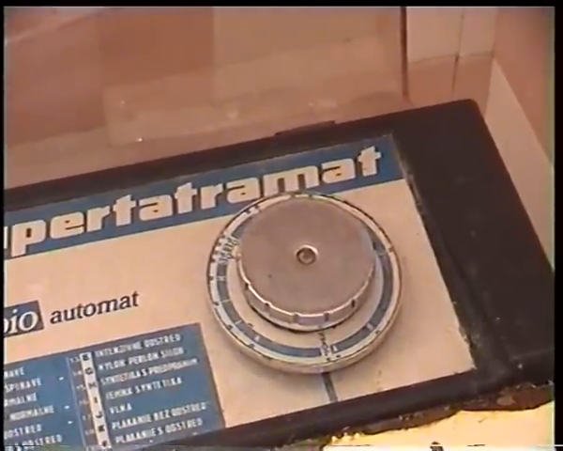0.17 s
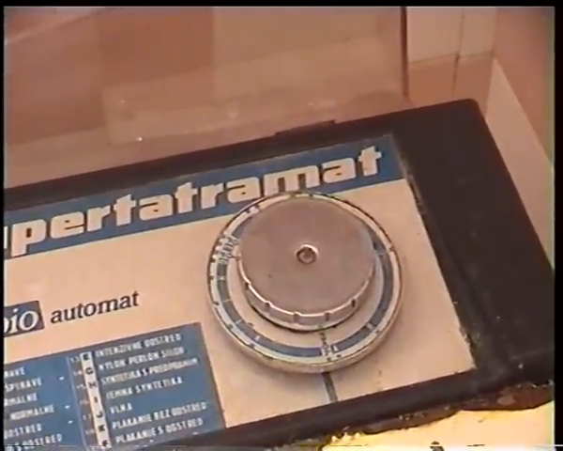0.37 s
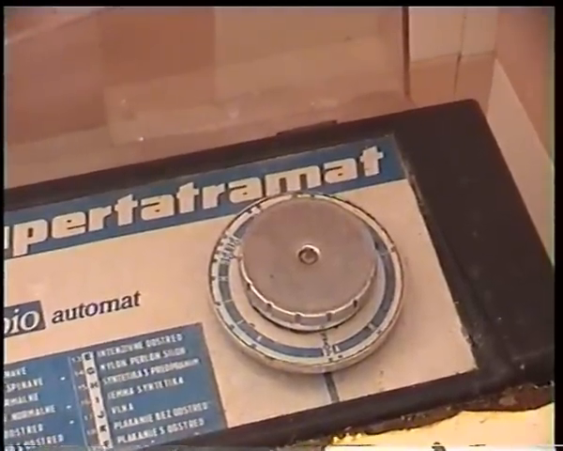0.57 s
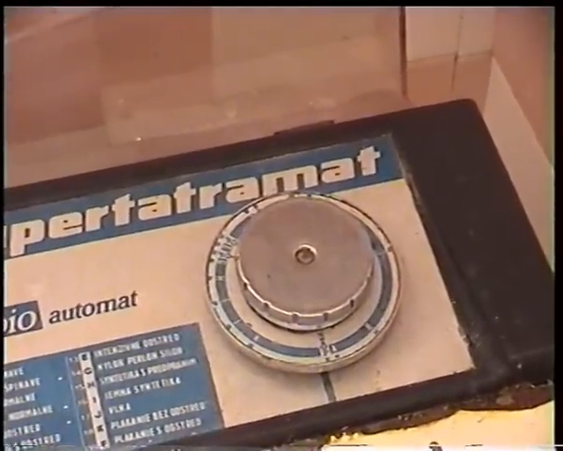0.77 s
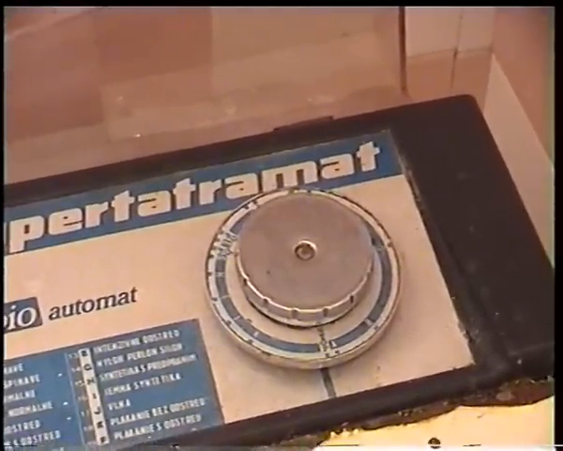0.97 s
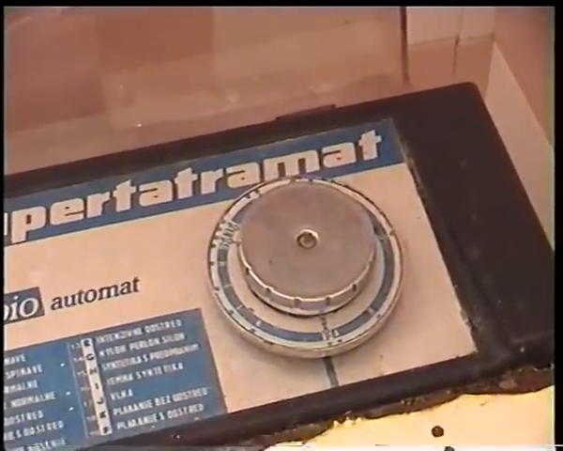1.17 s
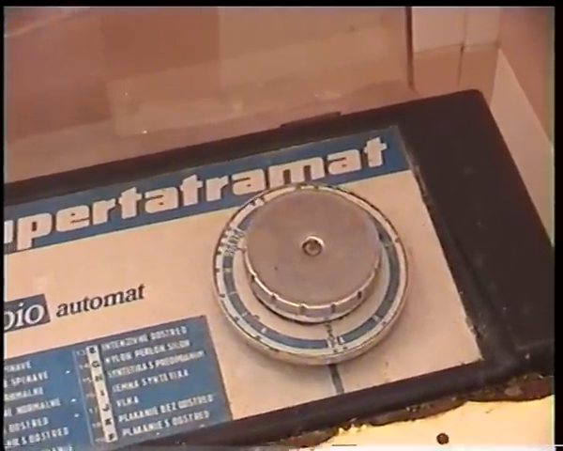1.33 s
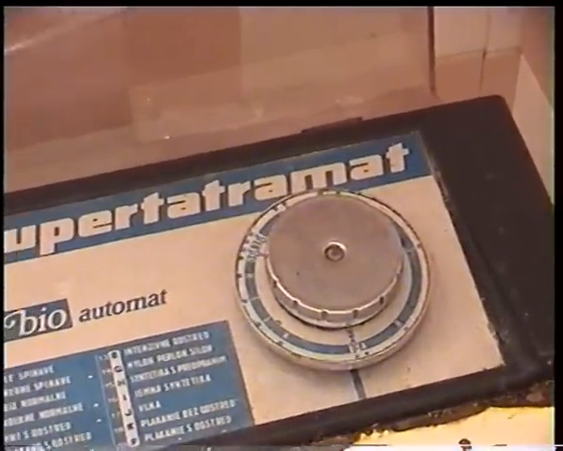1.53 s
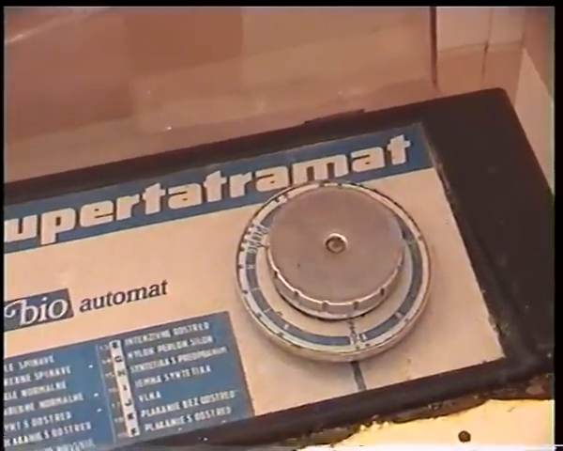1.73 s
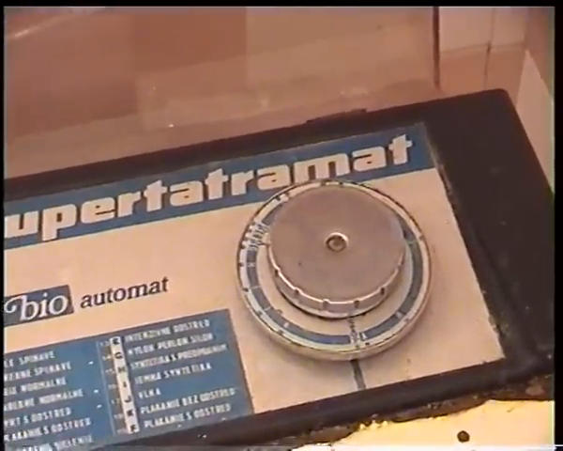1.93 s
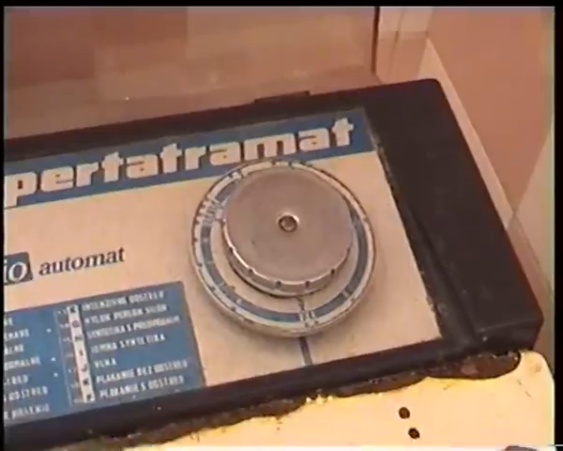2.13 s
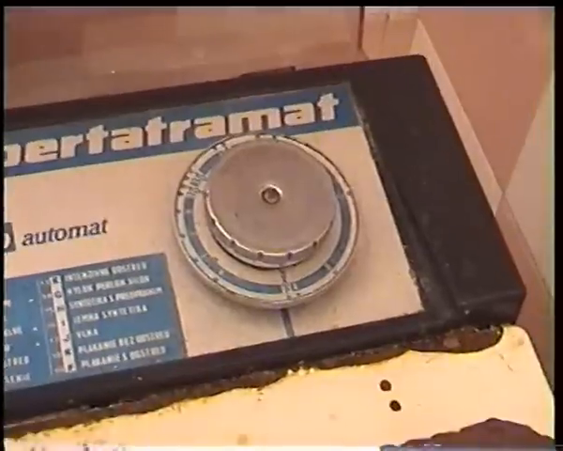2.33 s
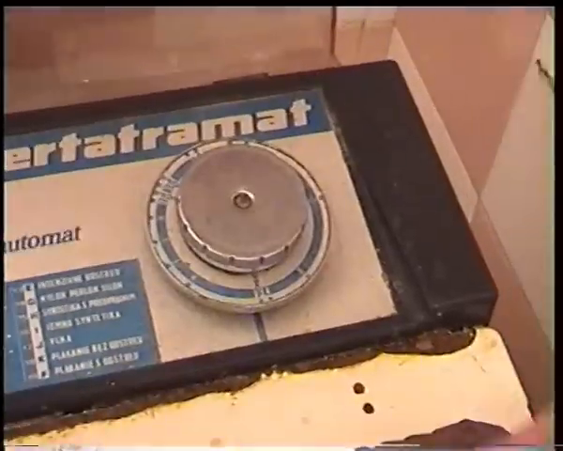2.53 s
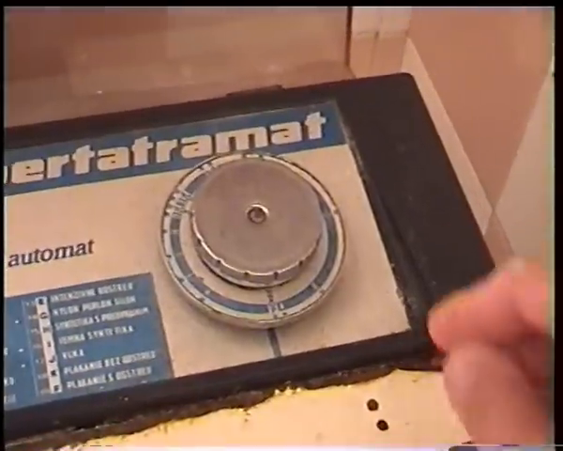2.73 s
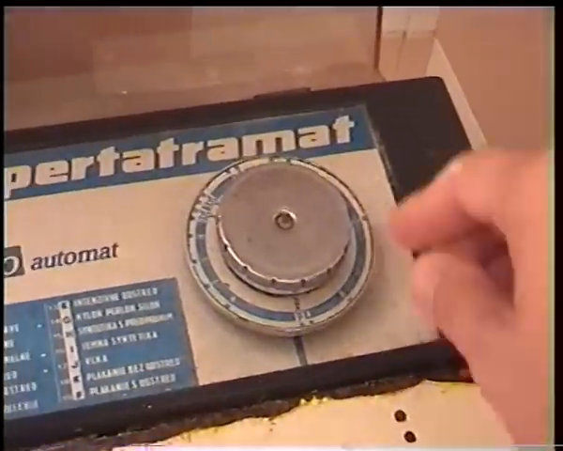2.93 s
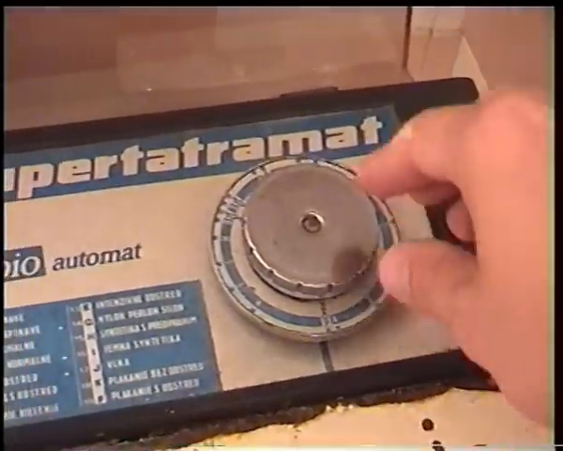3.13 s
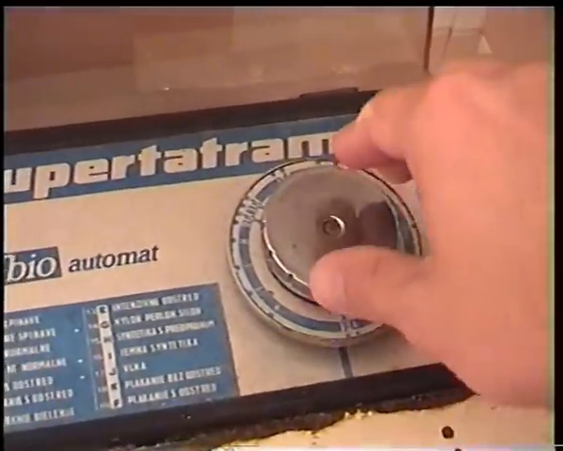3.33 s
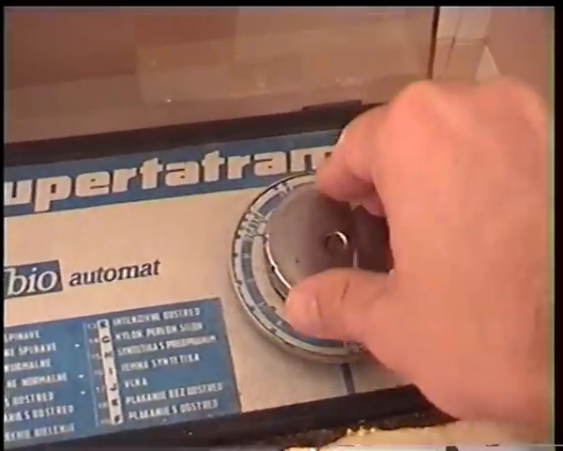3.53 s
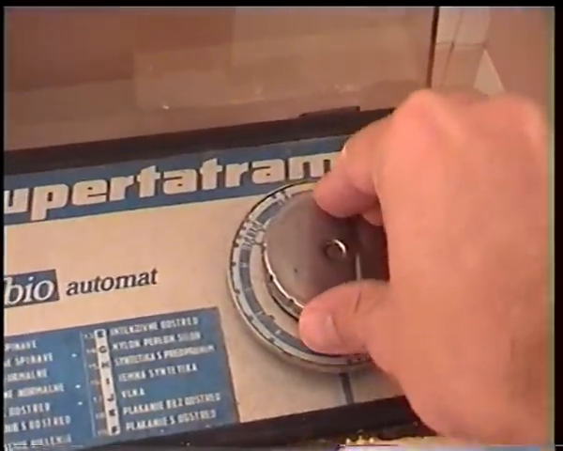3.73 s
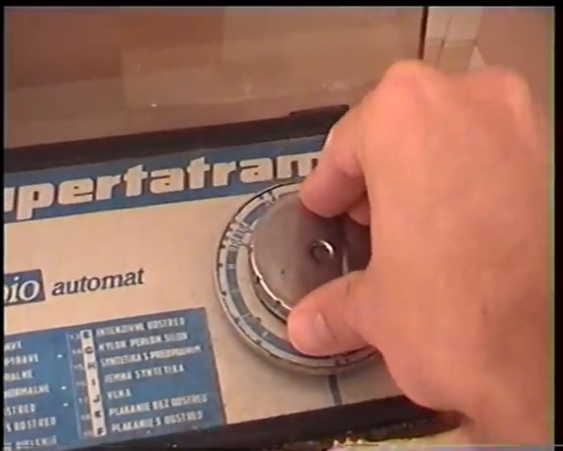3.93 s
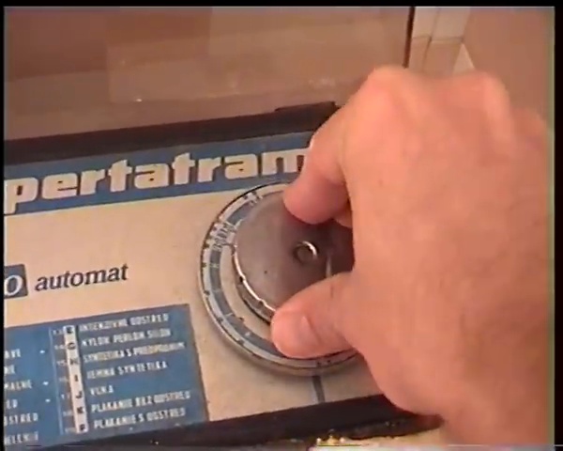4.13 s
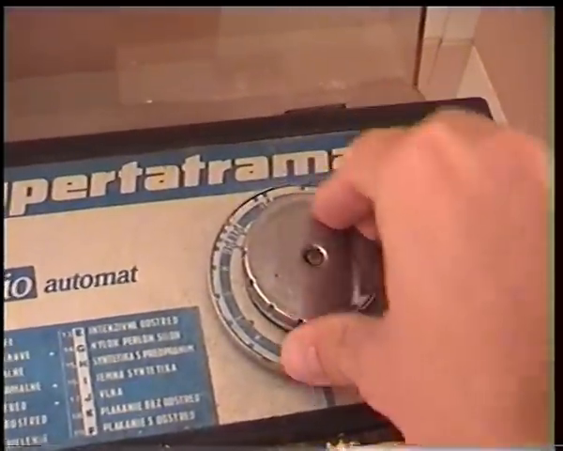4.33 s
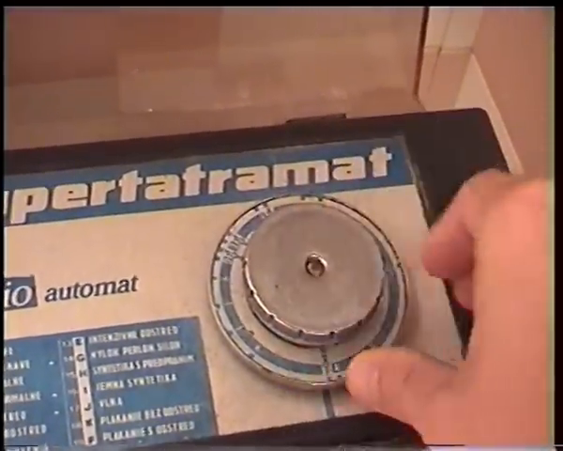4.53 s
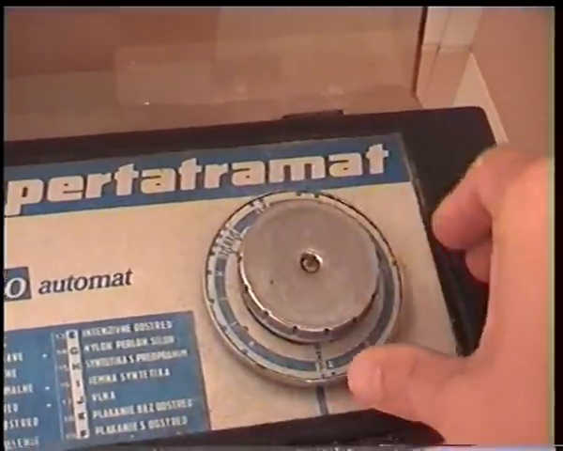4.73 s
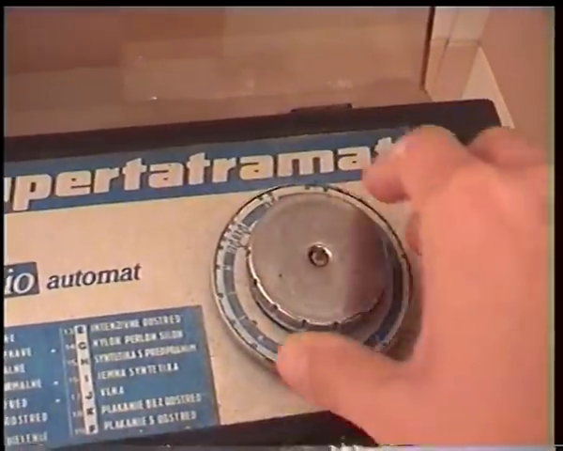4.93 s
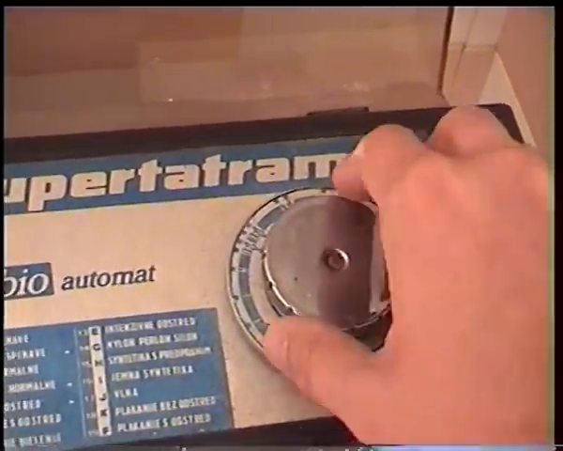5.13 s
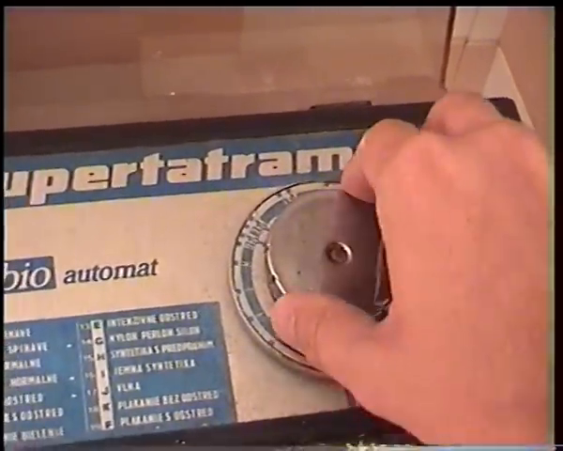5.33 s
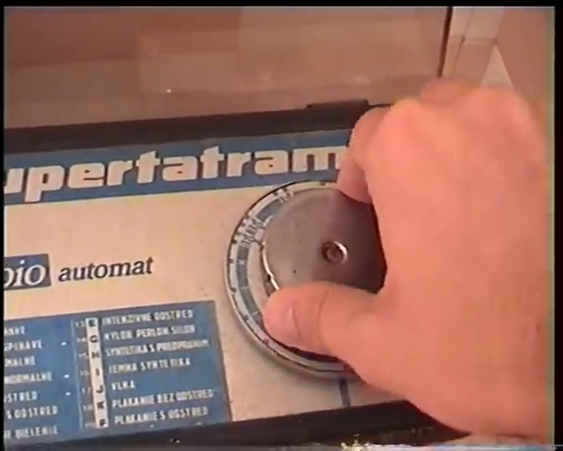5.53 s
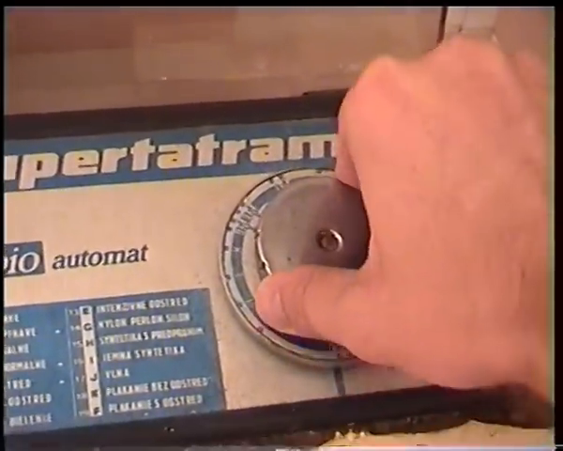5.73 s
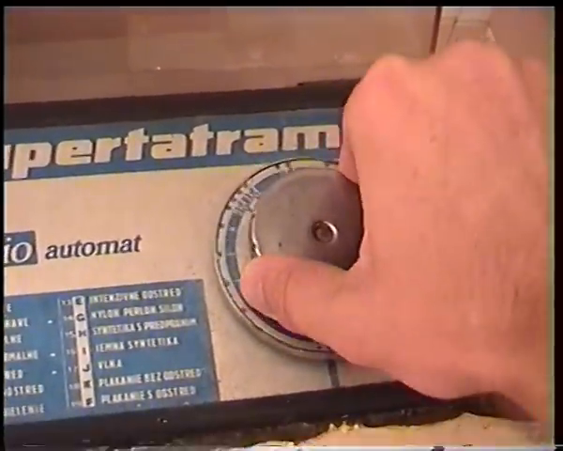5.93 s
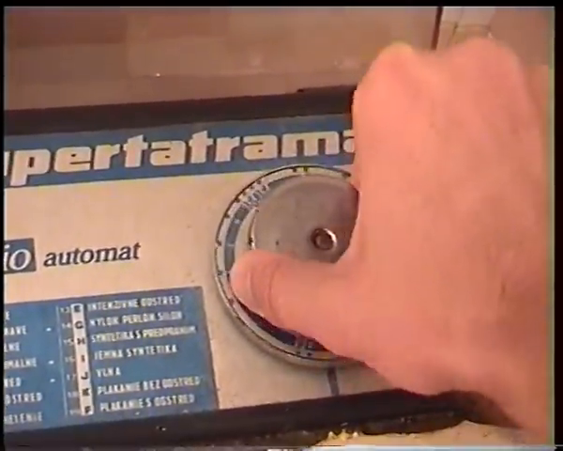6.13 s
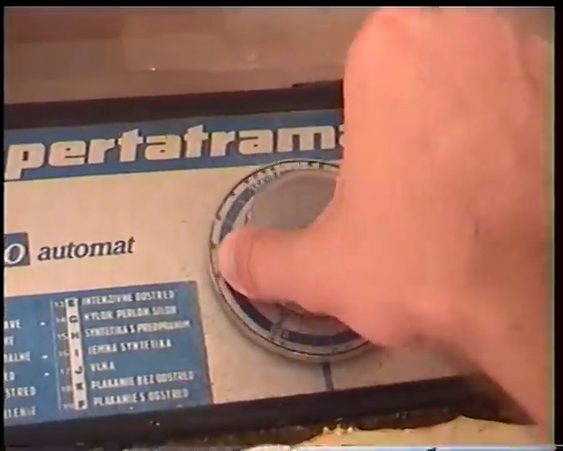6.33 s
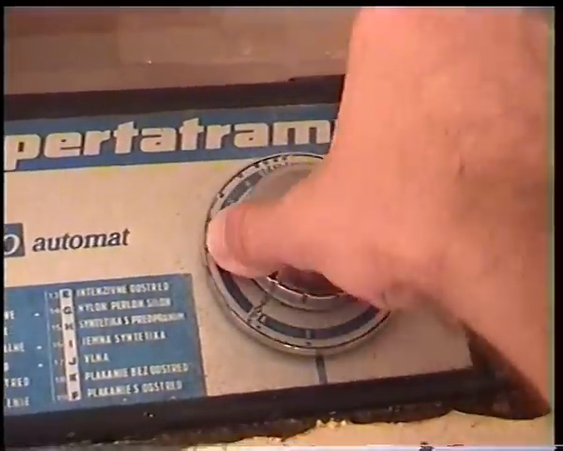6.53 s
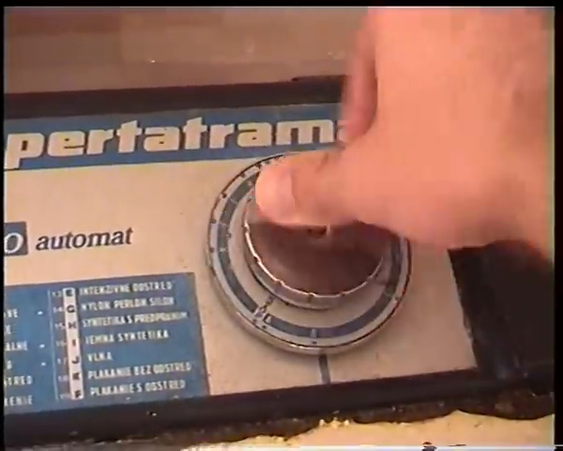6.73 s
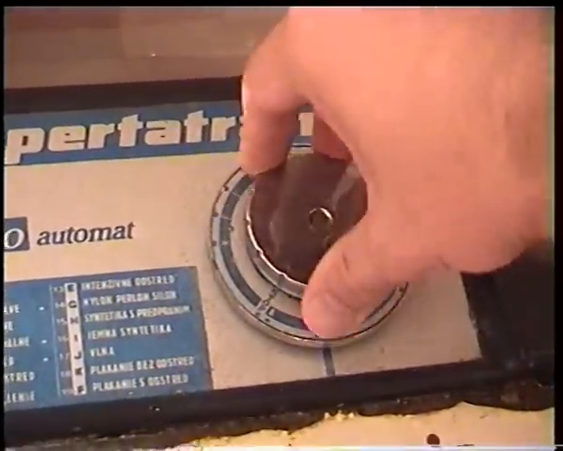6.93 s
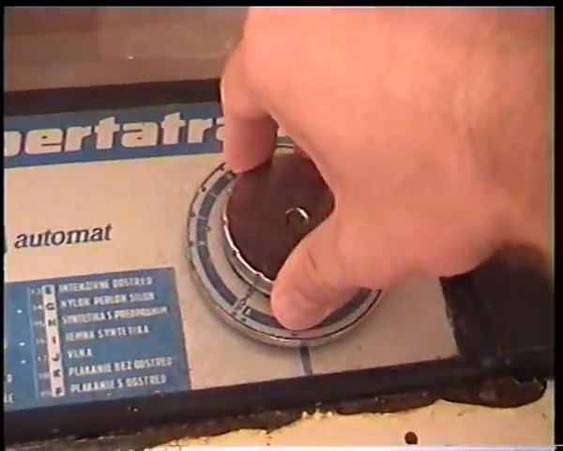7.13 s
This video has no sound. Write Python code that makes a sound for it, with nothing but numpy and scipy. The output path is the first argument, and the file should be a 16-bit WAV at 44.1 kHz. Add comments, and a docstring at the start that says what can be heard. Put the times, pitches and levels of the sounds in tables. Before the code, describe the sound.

In a small, hard tiled bathroom, an old washing machine's timer grinds steadily, about ten raspy pulses a second. A loud multiple clack of the pulled dial cuts it off, leaving drum and spring ringing. Loose metal tinkles faintly, then the dial turns through a quick, uneven run of hard ratchet clicks. A close camcorder microphone adds hiss, motor whirr and a thin high whistle.

```python
"""A timer motor grinds ten teeth a second in a small tiled bathroom, until a metal dial is pulled with a clack.
Later the dial is turned over its ratchet; its loose cap tinkles. The gears are modulated noise through
resonances, the contacts are short noise bursts, and drum and spring ring on after them.
A camcorder adds hiss, whirr, a pop, its line whistle, a limiter and a thump that follows the treble."""
import sys
import numpy as np
from scipy import signal
from scipy.fft import rfft, irfft, next_fast_len
from scipy.io import wavfile
from scipy.ndimage import uniform_filter1d, minimum_filter1d, map_coordinates

SR = 44100
rng = np.random.default_rng(int(sys.argv[2]) if len(sys.argv) > 2 else 0)


def to_wav(s):
    """Save 16-bit WAV."""
    ch = np.atleast_2d(s).T  # columns
    pcm = np.round(np.clip(ch, -1, 1) * 32767)  # PCM
    wavfile.write(sys.argv[1], SR, pcm.astype(np.int16))


N = 320827
TIME = np.arange(N) / SR  # seconds

# The pulled switch, a run of contacts. Each row: start in seconds, level in dB, chatter decay in seconds.
CLACK = [(3.953, -20, 0.0055), (3.957, -18.5, 0.017), (3.978, -18, 0.015), (4.0, -21.5, 0.015)]


def amp(db):
    """Gain of a level in dB."""
    return 10 ** (np.asarray(db) / 20)


def unit(x):
    """Scale x to rms 1."""
    return x / np.sqrt(np.mean(x ** 2) + 1e-20)


def along(points, hz):
    """Interpolate (Hz, value) points on a log frequency axis."""
    f, v = np.transpose(points)
    return np.interp(np.log(hz + 1), np.log(f + 1), v)


def filtered(x, response):
    """Multiply the spectrum of x by a response of frequency."""
    m = next_fast_len(len(x) + SR // 2, real=True)
    spectrum = rfft(x, m) * response(np.fft.rfftfreq(m, 1 / SR))
    return irfft(spectrum, m)[:len(x)]


def modes(table):
    """Causal response of (Hz, width Hz, dB) resonances, summed with alternating sign."""
    def response(f):
        total = 0
        for k, (hz, width, db) in enumerate(table):
            damping = 1j * f * width
            total = total + (-1) ** k * amp(db) * damping / (hz * hz - f * f + damping)
        return total
    return response


def scattered(table, spread_db):
    """The same resonances with a fresh random level offset on each, as if struck elsewhere."""
    return modes(np.array(table) + [0, 0, 1] * rng.normal(0, spread_db, (len(table), 1)))


def coloured(response, count):
    """White noise shaped by a response and scaled to rms 1."""
    return unit(filtered(rng.standard_normal(count), response))


def wander(count, rate_hz):
    """Smooth random curve through `count` normal values, rate_hz of them a second."""
    return map_coordinates(rng.standard_normal(count), [TIME * rate_hz])


def tail(length):
    """Decay of the tiled room as noise of energy 1, each frequency dying at its own speed."""
    # Each row: frequency in Hz, time to fall by 60 dB in seconds.
    tiles = [(60, 1), (250, 0.75), (600, 0.61), (2000, 0.55), (5000, 0.45), (8000, 0.33), (11000, 0.28),
             (15000, 0.17)]
    hz, t, z = signal.stft(rng.standard_normal(int(length * SR)), SR, nperseg=256)
    fade = amp(-60 * t / along(tiles, hz)[:, None])
    x = signal.istft(z * fade, SR, nperseg=256)[1]
    return x / np.linalg.norm(x)


def add(out, s, db, chatter_s, response, wet_db, room_s, rise_s=0.0011):
    """Mix in a noise burst of chattering contacts, coloured by the object, and the tiles' answer."""
    t = np.arange(SR // 4) / SR
    envelope = np.exp(-t / chatter_s) * (1 - np.exp(-t / rise_s))
    burst = coloured(response, count=len(t)) * envelope
    heard = amp(wet_db) * signal.fftconvolve(burst, tail(room_s))
    heard[:len(t)] += burst
    place = out[round(s * SR):round(s * SR) + len(heard)]
    place += amp(db) * heard[:len(place)]


def hiss_and_whirr():
    """Noise shaped into hiss, rumble and the tape drive's resonances, with a slight flutter in level."""
    # Hiss and rumble. Each row: frequency in Hz, relative density in dB per Hz.
    air = [(12, -34), (20, -6), (140, -3), (195, -6), (321, -6), (974, -10.5), (1090, -5.5), (1900, -13),
           (2960, -11.5), (3790, -17), (9000, -17), (12000, -22), (14000, -23.5)]
    # The tape drive's resonances. Each row: frequency in Hz, width in Hz, relative level in dB.
    whirr = [(1107, 8, 1.5), (1694, 34.94, -1.5), (2394.1, 39, -0.5), (2930.7, 30.34, -16),
             (3150, 159.5, -12), (5148.4, 140, -6), (8400, 183.8, -18)]
    hiss = coloured(lambda f: amp(along(air, f)) + 0.29 * abs(modes(whirr)(f)), count=N)
    flutter = amp(0.6 * wander(200, rate_hz=15))
    return amp(-56) * hiss * flutter


def drive_tones():
    """Steady sines of the tape drive."""
    # Each row: frequency in Hz, rms level in dB.
    tones = [(1098, -77), (1125, -69.5)]
    return sum(amp(db + 3.0) * np.sin(2 * np.pi * hz * TIME) for hz, db in tones)  # 3 dB: rms to peak


def line_whistle():
    """A very high sine whose level wobbles at 50 and 100 Hz."""
    whistle_hz = 15626
    fields = 1 + 0.2 * np.cos(2 * np.pi * 50 * TIME) + 0.1 * np.cos(2 * np.pi * 100 * TIME)
    return amp(-63.5) * np.sqrt(2) * fields * np.sin(2 * np.pi * whistle_hz * TIME)


def electrical_pop():
    """A dry step that decays in a fraction of a millisecond, with little bass."""
    pop_s, decay_s = 4.555, 0.00016
    pop = amp(-28) * np.exp(-np.maximum(TIME - pop_s, 0) / decay_s) * (TIME >= pop_s)
    return filtered(pop, lambda f: 1j * f / (250 + 1j * f))


def fidget(count):
    """Faint stirrings of the cap at random moments while the hand hovers: (s, dB, chatter s) rows."""
    # The start and end of the hovering, in seconds.
    hover_s = (4.65, 5.6)
    level_db, spread_db, chatter_s = -61, 2.5, 0.008
    when, size, life = rng.uniform(-1, 1, (count, 3)).T
    starts = np.interp(when, (-1, 1), hover_s)
    return list(zip(starts, level_db + spread_db * size, chatter_s * 2 ** life))


def loose_cap():
    """The cap slides and tinkles, its modes rung anew each time; a fingertip brushes the panel once."""
    # Slides and tinkles. Each row: start in seconds, level in dB, chatter decay in seconds.
    tinkles = [(1.773, -38, 0.0069), (4.28, -43, 0.028), (4.31, -45, 0.017), (5.042, -53, 0.00638),
               (6.615, -48.5, 0.027), (6.668, -38.5, 0.0068), (6.891, -60, 0.031), (7.019, -58, 0.04),
               (7.1, -61, 0.0616), (7.24, -49.5, 0.02336)]
    # The cap's resonances. Each row: frequency in Hz, width in Hz, level in dB before scatter and sharpening.
    cap_modes = [(7200, 120, -12), (8430, 330, -5.5), (9970, 290, -5), (11500, 220, -8.5),
                 (13520, 160, -17)]
    # The fingertip's brush: start in seconds, level in dB, chatter decay in seconds.
    scuff = (5.11, -57, .03)
    out = np.zeros(N)
    for s, db, chatter_s in tinkles + fidget(count=7):
        struck = scattered(cap_modes, spread_db=2.2)
        sharpened = lambda f: abs(struck(f)) ** 1.3
        add(out, s, db, chatter_s, sharpened, wet_db=-6, room_s=0.3, rise_s=0.3 * chatter_s)
    add(out, *scuff, modes([(3000.0, 253.7, 0)]), wet_db=0, room_s=0.3, rise_s=0.00794)
    return out


def timer():
    """Each tooth swells in gradually and lets go a little faster; mains pulses roughen the drive."""
    # The gear train as it creeps round. Each row: time in seconds; relative levels of cabinet, low grind,
    # high grind and fizz in dB; lateness of the mesh in seconds; depth factor of the dip between teeth.
    train = [(0, -43, -51.5, -47.5, -54, 0.09, .88), (.45, -43.5, -47.5, -48.5, -48, 0.09, 0.83),
             (1, -44, -48, -50.5, -48, .09, .92), (1.55, -44, -47.5, -49.5, -46.5, 0.092, 0.63),
             (1.7, -42, -48.5, -47.5, -52.5, 0.089, 1.15), (2.1, -43, -46.5, -49, -49, 0.08, 1.37),
             (2.7, -44, -44, -50.5, -52, 0.072, 1.63), (3.2, -44.5, -46, -50, -48, 0.08, 1.35),
             (3.55, -44.5, -46.5, -51, -48, .079, 1.1), (3.95, -46, -48.5, -52, -51.5, 0.078, 1.05)]
    # Teeth that fizz harder. Each row: time in seconds, extra level in dB.
    rough_teeth = [(.59, 2), (.99, 4), (1.39, 1.5), (1.99, 4.5), (2.48, 3.5), (2.87, 2.5), (3.07, 3.5),
                   (3.68, 5.5)]
    # Sheet-metal panels. Each row: frequency in Hz, width in Hz, relative level in dB.
    cabinet = [(276, 35, -10), (358.5, 22, -3.5), (401.8, 18, -0.5), (427, 3, 4), (470, 5.2, -3),
               (526, 31, -3), (664, 43.6, 2), (821, 72, -2), (1064.2, 173, -1.5), (1122.5, 31, 3.5),
               (1155, 29, 4), (1265, 51.63, -1.5), (1329.2, 42, 1.5), (2010, 1680, -12)]
    # The gears' resonances. Each row: frequency in Hz, width in Hz, relative level in dB.
    gears = [(2778, 170, -1), (3004, 107, 5), (3320, 480, 1.5), (4080, 840, -4.5), (4520, 720, -2)]
    # The fizz spectrum. Each row: frequency in Hz, relative density in dB per Hz.
    fizz = [(3060, -15), (5200, 3), (6290, 1.5), (6910, 5.5), (8510, 5), (13200, -9.5), (15000, -11),
            (15300, -4)]
    teeth_per_s, tooth_scatter_db = 10, 1
    s, *columns = np.transpose(train)
    *levels, late_s, slack = [np.interp(TIME, s, c) for c in columns]
    for at, db in rough_teeth:
        levels[-1] = levels[-1] + db * np.clip(1 - abs(TIME - at) * teeth_per_s, 0, 1)
    # Each layer: colour, dip between teeth in dB, lag in seconds (the panels answer later than the gears).
    layers = [(modes(cabinet), 4, 0.0089), (modes(gears[:3]), 11, 0), (modes(gears[3:]), 11, 0),
              (lambda f: amp(along(fizz, f)), 14, 0)]
    buzz = 1 + 0.086 * np.cos(2 * np.pi * 100 * TIME)
    grit = amp(1.1 * wander(N // 50, rate_hz=300))
    running = TIME < CLACK[1][0]  # stops at the second contact of the clack
    out = np.zeros(N)
    for db, (colour, dip_db, lag_s) in zip(levels, layers):
        teeth = (TIME - late_s - lag_s) * teeth_per_s + 1
        turn = 2 * np.pi * (teeth + 0.031)
        gap = (1 - np.cos(turn - 0.135 * np.cos(turn))) / 2  # 0 in mesh, 1 between teeth
        between = slack * gap ** 1.25
        uneven = tooth_scatter_db * map_coordinates(rng.standard_normal(100), [teeth], order=1)
        stumble = amp(1.45 * wander(300, rate_hz=30))
        drive = rng.standard_normal(N) * buzz * grit * stumble
        drive *= amp(db + uneven - dip_db * between) * running
        norm = np.sqrt(np.mean(abs(colour(np.fft.rfftfreq(SR, 1 / SR))) ** 2))
        out += filtered(drive, colour) / norm
    room = amp(-6.5) * signal.fftconvolve(out, tail(1))[:N]
    return amp(-3) * (out + room)


def pulled_switch():
    """A run of contacts: a broad blow plus the ringing of the switch and its metal knob."""
    # The switch's resonances. Each row: frequency in Hz, width in Hz, level in dB before a common gain.
    switch_modes = [(257.74, 50, -11), (645, 39, -2), (870, 64, -1), (1100, 54.6, -13), (4320, 160, 1.5),
                    (4610, 130, 0.5), (5830, 100, -4), (7560, 102, -13)]
    # The metal knob's main ring. Each row: frequency in Hz, width in Hz, level in dB before the same gain.
    knob = [(2885, 110, 7)]
    # The broad blow. Each row: frequency in Hz, relative density in dB per Hz.
    blow = [(41, -49), (70, -2.5), (894, -7.5), (978, -7), (1120, 2), (1570, -4.5), (2890, -5), (3870, -11),
            (4430, -16.5), (7440, -4.5), (10800, -7.5), (12200, -17), (15300, -22)]
    ring = modes(sorted(switch_modes + knob))
    colour = lambda f: amp(along(blow, f) - 0.5) + 1.18 * abs(ring(f))
    out = np.zeros(N)
    for s, db, chatter_s in CLACK:
        add(out, s, db, chatter_s, colour, wet_db=5.5, room_s=0.9)
    return out


def ratchet():
    """The pawl drops into notches, ringing the dial anew; returns clicks and the top plate's thuds."""
    # The notches. Each row: start in seconds, level in dB, chatter decay in seconds, brightness in dB per
    # octave, mode rung hardest in Hz, thud level in dB.
    notches = [(5.866, -44.5, 0.025, -1, 8895, -70), (5.877, -19.5, 0.017, -0.5, 3800, -41),
               (5.953, -15, 0.0064, 0, 9000, -39), (6.081, -18.5, 0.019, 0, 4208, -33),
               (6.199, -18, 0.013, 0, 8210, -44), (6.304, -17, 0.011, 0.5, 720, -30.5),
               (6.351, -17, 0.022, 1, 7600, -37), (6.394, -18.5, 0.011, 0.55, 760, -34.5)]
    # The dial's resonances. Each row: frequency in Hz, width in Hz, level in dB before scatter and gain.
    dial_modes = [(696, 89, -1.5), (1285, 61, 1), (2060, 32, 0), (2650, 97.7, 2), (3200, 650, -5),
                  (4000, 200, -1.5), (6224, 50, -12.5), (7650, 89, -15), (7800, 80.4, -7), (8270, 122.3, 3),
                  (9100, 92.8, 2), (9900, 73.1, 5), (12200, 233.7, -8), (12500, 217.5, -12)]
    # The pawl's broad blow. Each row: frequency in Hz, relative density in dB per Hz.
    blow = [(60, -18), (140, -13), (250, -8.5), (561, -4.5), (700, -2), (1610, -9), (2050, -4), (4200, -6),
            (5780, -8.5), (8160, -3.5), (11000, -7.5), (15300, -15.5)]
    thud_hz, thud_s = 85, 0.0049  # the top plate gives once under each notch
    since = TIME[:SR // 10]
    swell = since / thud_s * np.exp(1 - since / thud_s)
    thud = np.sin(2 * np.pi * thud_hz * since) * swell
    clicks, plate = np.zeros((2, N))
    for s, db, chatter_s, tilt, hardest_hz, thud_db in notches:
        struck = scattered(dial_modes, spread_db=1.5)
        hardest = modes([(hardest_hz, 260, 2)])

        def pawl(f):
            body = amp(along(blow, f) + 3.5) + 0.5 * abs(struck(f)) + 0.58 * abs(hardest(f))
            return body * amp(tilt * np.log2(f / 3000 + 0.00964))

        add(clicks, s, db, chatter_s, pawl, wet_db=4, room_s=0.66, rise_s=0.0017)
        plate[round(s * SR):][:len(since)] += amp(thud_db) * thud
    return clicks, plate


def drum_ring(clack, clicks):
    """Narrow drum resonances ring on after the blows; a wandering level stands for beating close modes."""
    # Each row: frequency in Hz, width in Hz, relative level in dB.
    ringing = [(124.74, 3.7, -14.5), (240.7, 3.2, -3), (266.6, 5, -4), (323, 2.5, -2), (408, 1.4, -4),
               (473, 2, -17), (716, 4.8, -4), (738, 0.72, -5), (790.44, 0.99, -9), (1250, 1.7, -7),
               (1340, 4.6, -3)]
    drum = filtered(amp(9) * clack + clicks, modes(ringing))
    return drum * amp(3 * wander(200, rate_hz=14))


def spring_ring(clack):
    """Narrow high resonances of a spring ring on after the clack."""
    # Each row: frequency in Hz, width in Hz, relative level in dB.
    spring = [(2830, 4.5, -16), (2859.8, 4.944, -8), (2942, 2.8, -5.5), (2870, 5.1, -4), (4364, 6.16, -10),
              (4446, 4.79, -8.5), (4619, 3.25, 3)]
    return amp(0.5) * filtered(clack, modes(spring))


def dial():
    """The switch and the ratchet, with the drum and spring they set ringing."""
    clack = pulled_switch()
    clicks, plate = ratchet()
    return clack + clicks + plate + drum_ring(clack, clicks) + spring_ring(clack)


def scene():
    """Cap, timer and dial together at the microphone."""
    return (loose_cap() + timer() + dial())[None]


def limiter(x):
    """Turn loud passages down from their short-term rms, looking slightly ahead, then clip softly."""
    level = np.sqrt(abs(uniform_filter1d(x ** 2, size=220)))
    need = np.minimum(1, (amp(-14.5) / (level + 1e-9)) ** 0.516)
    gain = uniform_filter1d(minimum_filter1d(need, size=440), size=220)
    return amp(-3) * np.tanh(x * gain / amp(-4.5))


def bass_thump(loud):
    """The treble's envelope leaks through the coupling stages as a low thump."""
    treble = filtered(loud, lambda f: f > 8000)
    envelope = np.sqrt(abs(uniform_filter1d(treble ** 2, size=130)))
    coupling = lambda f: (1j * f / (9 + 1j * f)) ** 3 / (1 + 1j * f / 160)  # three high-passes, one low-pass
    return amp(-12) * filtered(-envelope ** 0.62, coupling)


def record(dry):
    """The camcorder: limiter and thump, then its own noises, all cut off above the band limit."""
    top_hz = 15760
    loud = limiter(dry[0])
    own_noise = hiss_and_whirr() + electrical_pop() + drive_tones() + line_whistle()
    wet = loud + bass_thump(loud) + own_noise
    return filtered(wet, lambda f: f < top_hz)[None]


dry = scene()
out = record(dry)
to_wav(out)
```